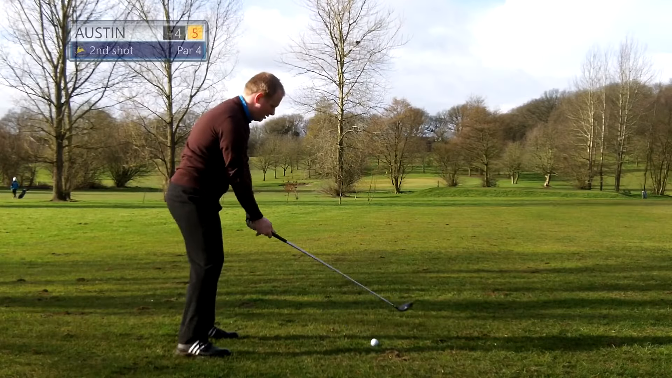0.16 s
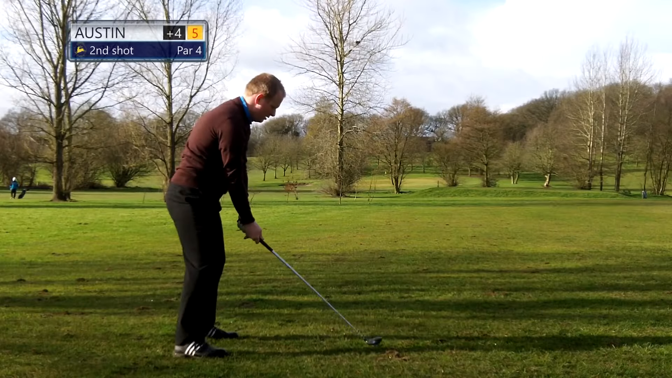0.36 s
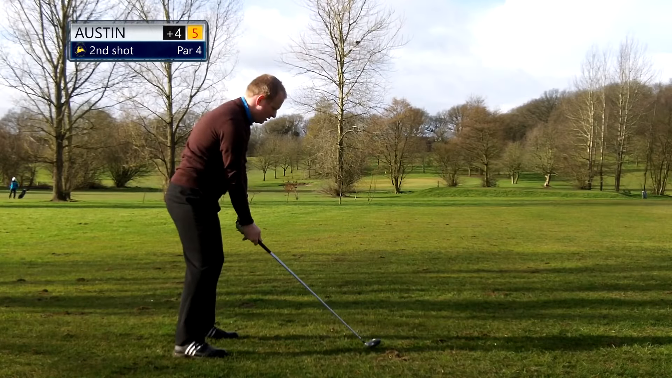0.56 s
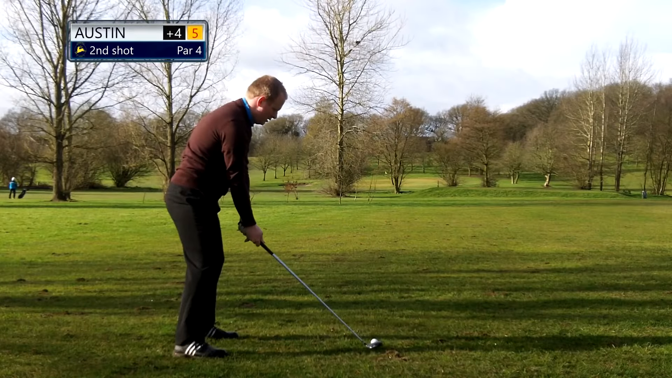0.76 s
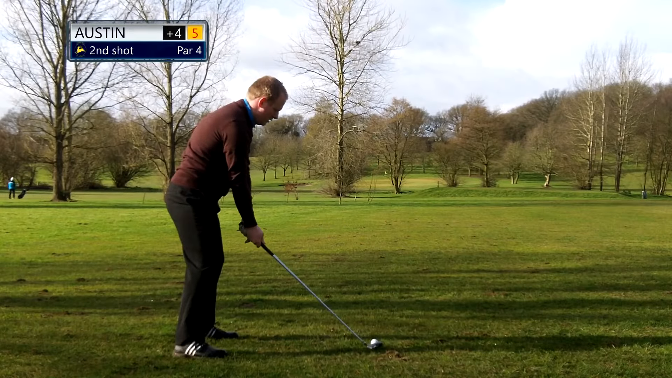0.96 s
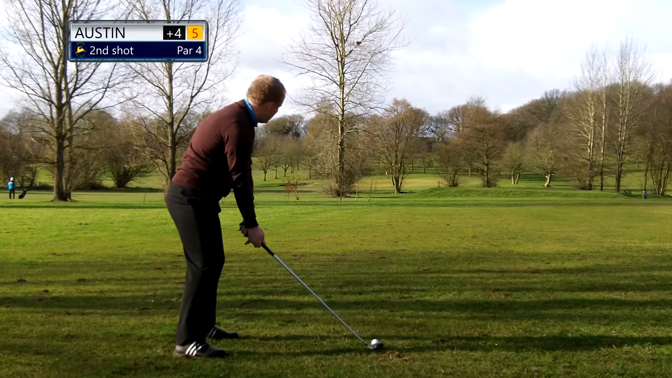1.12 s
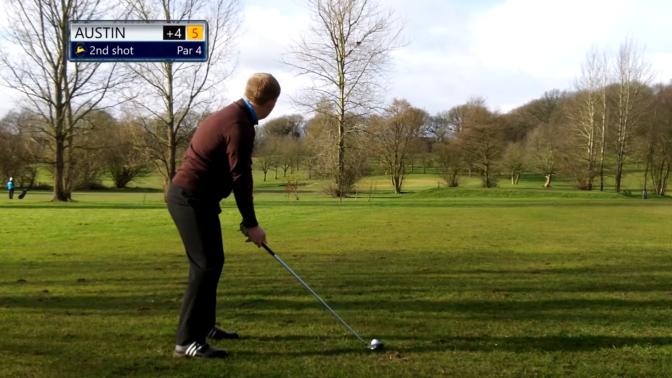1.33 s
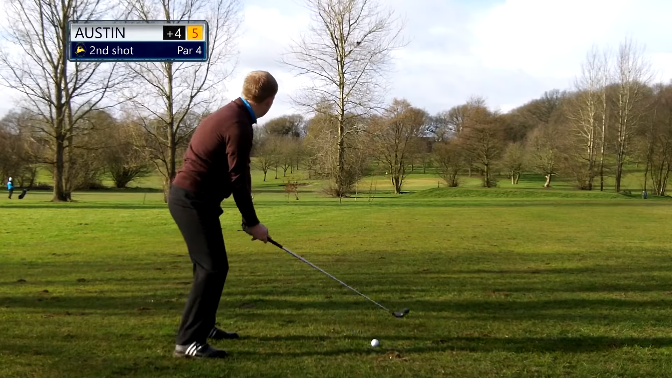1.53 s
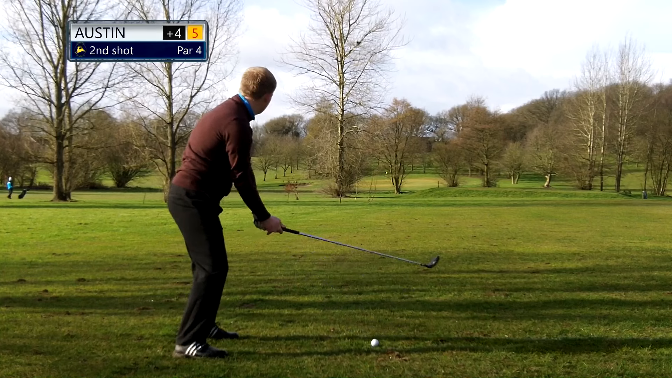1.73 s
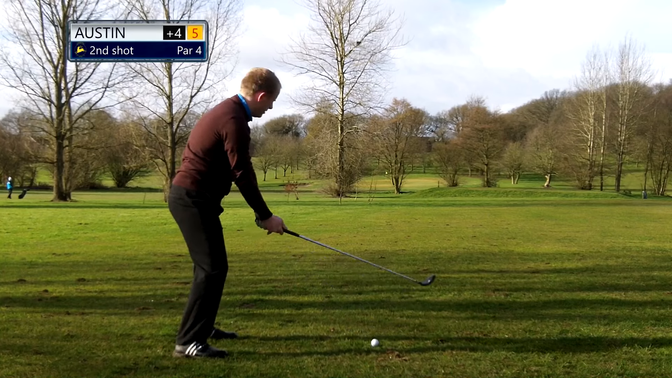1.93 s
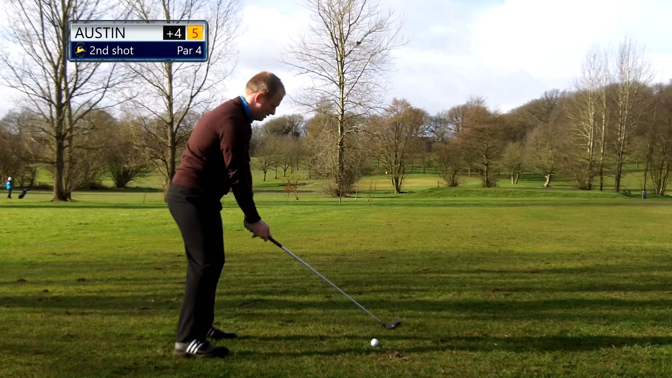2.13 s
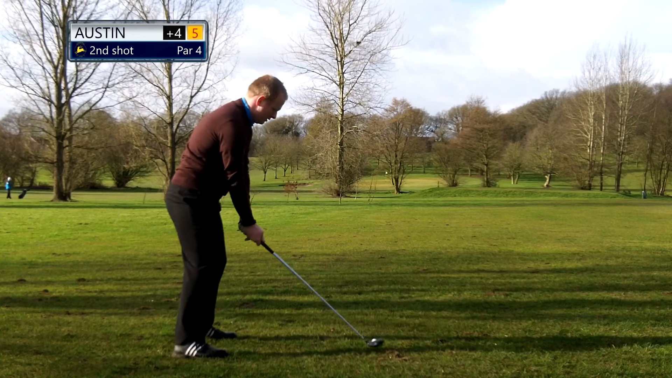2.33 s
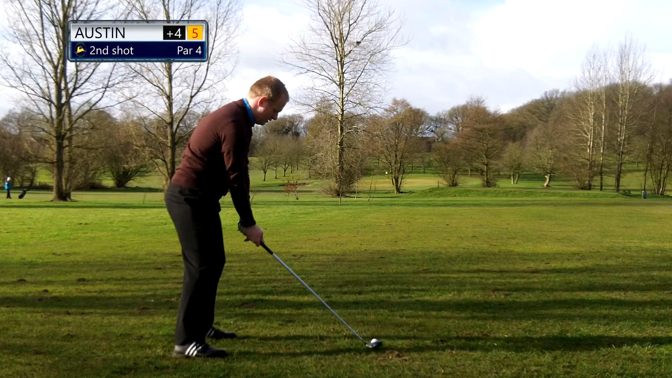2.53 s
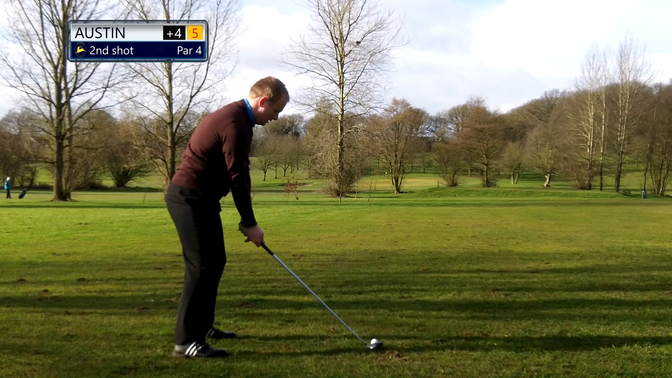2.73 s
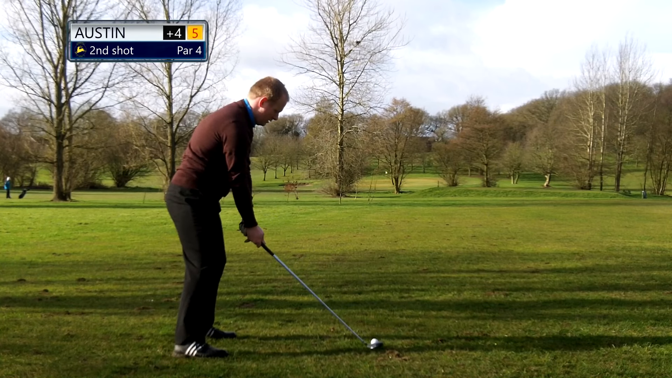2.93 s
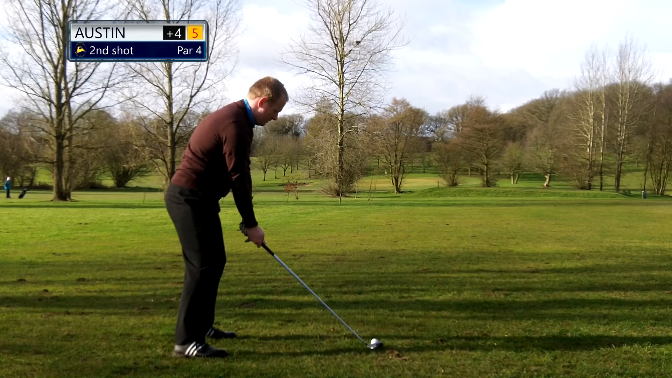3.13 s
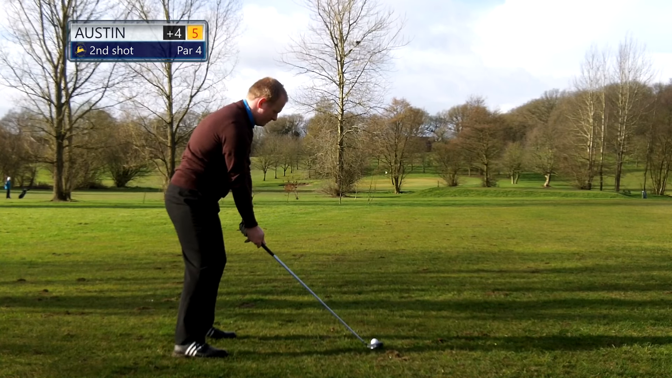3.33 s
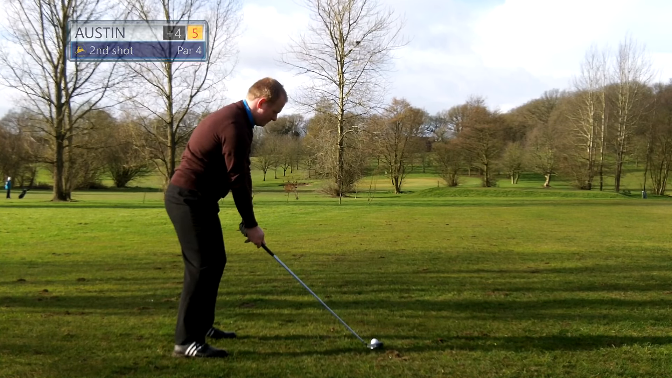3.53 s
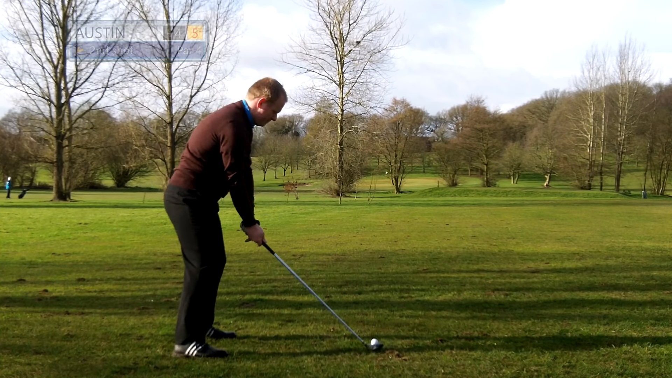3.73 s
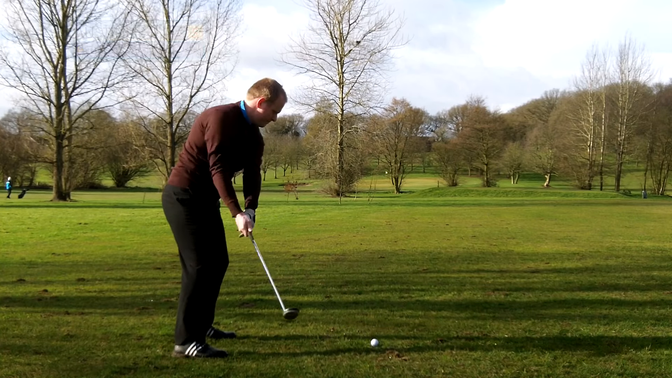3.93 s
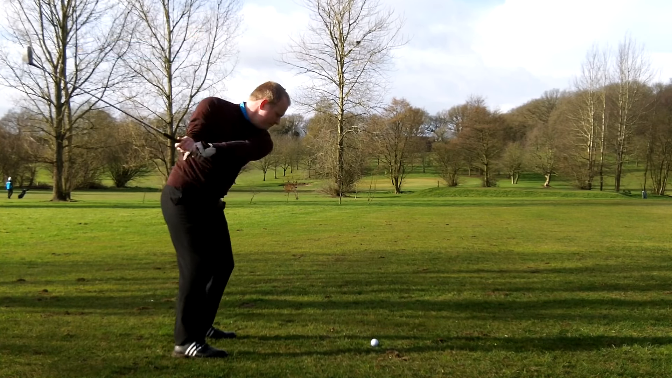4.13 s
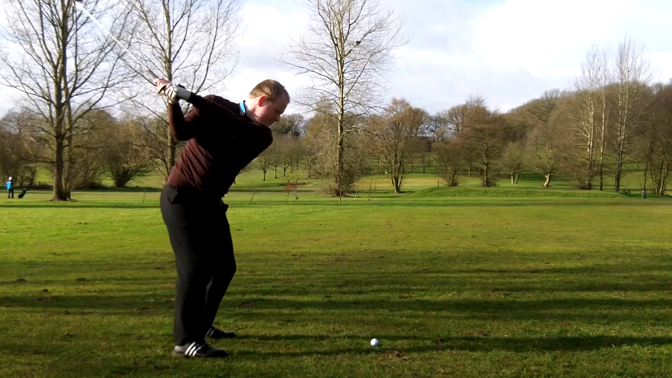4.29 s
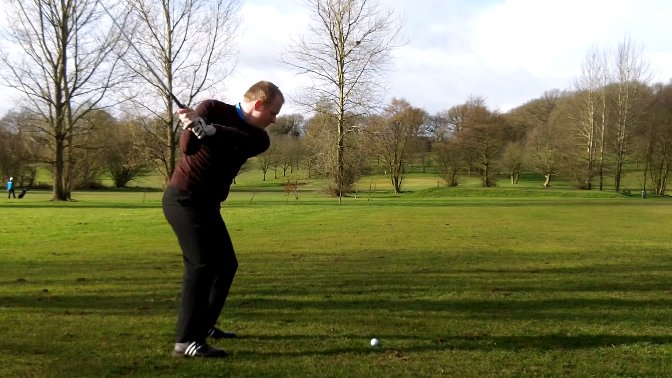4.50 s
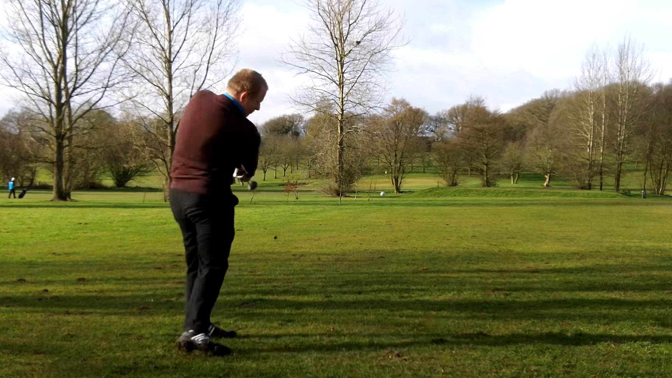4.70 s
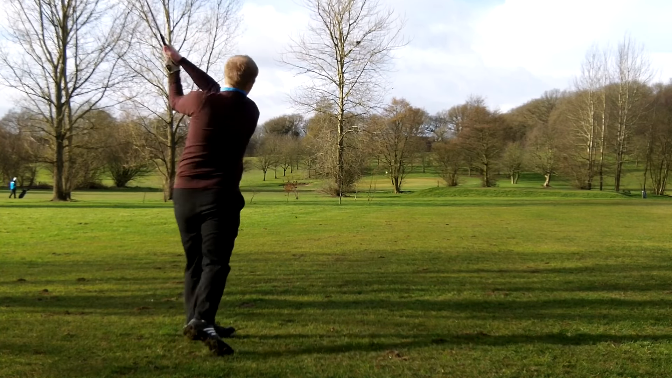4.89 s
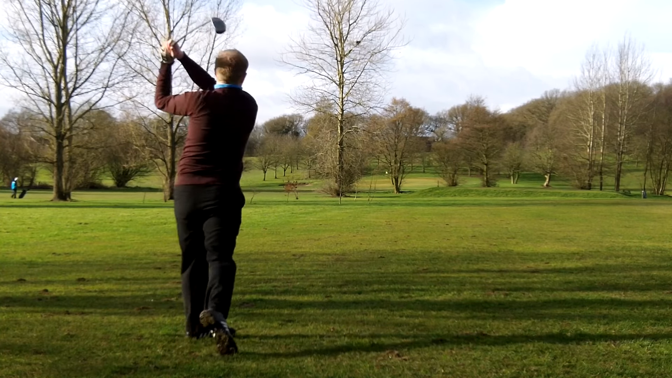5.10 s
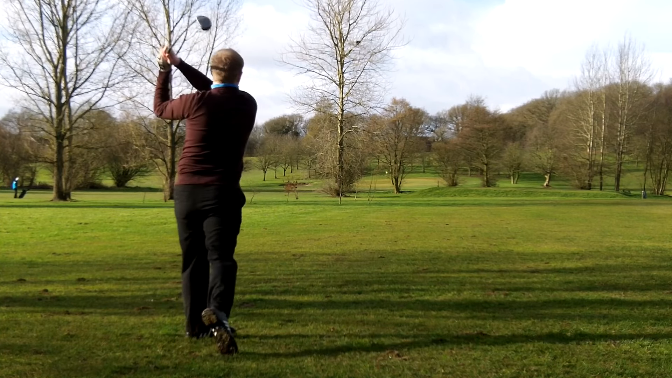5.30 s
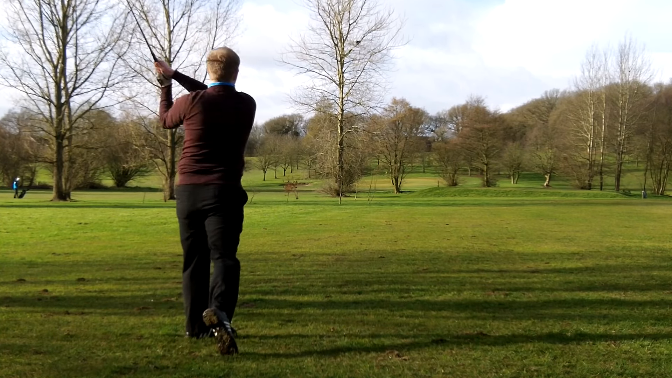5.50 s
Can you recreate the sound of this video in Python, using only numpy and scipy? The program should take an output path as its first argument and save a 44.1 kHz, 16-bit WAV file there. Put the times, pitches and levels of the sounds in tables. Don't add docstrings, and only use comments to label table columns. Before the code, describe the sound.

On an open golf course, far traffic hums low and wind bumps the microphone while distant birds whistle and chatter. A dry wooden knock with a low thump comes early on. Near the end a brief swish leads into one very loud, clipped click of club on ball with a spray of turf. The background dips for an instant, then dull echoes return from the trees.

```python
import sys
import numpy as np
from scipy import signal
from scipy.fft import rfft, irfft
from scipy.io import wavfile
from scipy.ndimage import uniform_filter1d, map_coordinates

SR = 44100
rng = np.random.default_rng(int(sys.argv[2]) if len(sys.argv) > 2 else 0)


def dump_mix(stems):
    frames = np.atleast_2d(stems).T
    limited = np.clip(frames, -1, 1)
    pcm = np.round(limited * 32767).astype(np.int16)
    wavfile.write(sys.argv[1], SR, pcm)


def attenuation_scalar(level_db):
    decades = np.asarray(level_db, float) / 20
    return 10 ** decades


N = 244755
STRIKE_S = 4.738777


def unit(x):
    return x / np.sqrt(np.mean(x ** 2) + 1e-20)


def curves(rows):
    s, *columns = np.transpose(rows)
    return [np.interp(np.arange(N) / SR, s, column) for column in columns]


def wobble(rate, size=N):
    knots = rng.standard_normal(int(size * rate / SR) + 4)
    return map_coordinates(knots, [np.arange(size) * rate / SR])


def noise(gain, size=N):
    hz = np.fft.rfftfreq(size, 1 / SR) + 1
    return unit(irfft(rfft(rng.standard_normal(size)) * gain(hz), size))


def shape(points):
    f, db = np.transpose(points)
    return lambda hz: attenuation_scalar(np.interp(np.log(hz), np.log(f), db))


def add(x, s, sound):
    part = x[round(s * SR):][:len(sound)]
    part += sound[:len(part)]


def road():
    # start_s, level_db
    swells = [(0, -52), (.4, -52), (.9, -51), (1.15, -49), (1.6, -54.5), (2.1, -50), (2.6, -51), (3.2, -49),
              (3.7, -52.5), (4.5, -47.5), (4.9, -44), (5.15, -48), (5.55, -49)]
    # pitch_hz, level_db
    engine_colour = [(40, -30), (80, -0.5), (130, -4.5), (160, -3), (250, -1.5), (300, -5.5), (400, -18),
                     (800, -42.5)]
    # pitch_hz, level_db
    tyre_colour = [(100, -8), (300, -4), (480, -4.5), (820, -1.5), (1200, -5), (2000, -10.5), (3000, -15.5),
                   (5000, -23.5), (8000, -42), (12000, -120)]
    tyres_db, tyres_follow = -52.5, 0.14
    drone_db = curves(swells)[0]
    traffic_db = tyres_db + tyres_follow * (drone_db - drone_db.mean())
    drone = unit(attenuation_scalar(2.1 * wobble(6.21)) * noise(shape(engine_colour)))
    tyres = unit(attenuation_scalar(0.64 * wobble(8.9)) * noise(shape(tyre_colour)))
    return attenuation_scalar(drone_db + 0.5) * drone + attenuation_scalar(traffic_db + 1.5) * tyres


def wind():
    # peak_s, peak_db
    gust_list = [(.23, -36), (.43, -46.5), (1.0, -48), (1.11, -32), (1.3, -42.5), (1.58, -40), (1.7, -48),
                 (1.82, -42), (2.02, -41), (2.12, -47), (2.29, -42.5), (2.8, -44), (3.18, -44), (3.48, -39),
                 (3.62, -53), (3.77, -46), (3.89, -44), (4.11, -43), (4.22, -47), (4.42, -49), (4.74, -36),
                 (4.92, -48), (5.16, -47), (5.44, -49)]
    # pitch_hz, level_db
    rumble_colour = [(15, 1), (30, -0.5), (55, -3), (80, -11), (130, -12.5), (300, -63)]
    rise_s, fall_s = 0.037, 0.078
    breeze_db, breeze_db_per_s = -48.5, -0.5
    t = np.arange(N) / SR
    gusts = np.zeros(N)
    for s, db in gust_list:
        gusts += attenuation_scalar(db) * np.exp(-np.maximum((s - t) / rise_s, (t - s) / fall_s))
    rumble = unit(attenuation_scalar(2.0 * wobble(31)) * noise(shape(rumble_colour)))
    return np.hypot(gusts, attenuation_scalar(breeze_db + breeze_db_per_s * t)) * rumble


def flocks():
    # start_s, length_s, centre_hz, width_hz, level_db
    bursts = [(0.093, 1, 3200, 350, -67), (1.551, 0.79, 3460, 250, -63), (2.402, 0.25, 4150, 250, -67),
              (2.552, 0.39, 3700, 350, -61.5), (3.489, 0.13, 3300, 180, -59), (3.55, 0.3, 3270, 300, -67),
              (3.651, .25, 2214, 100, -65), (4.85, 0.39, 3900, 300, -63), (5.416, 0.144, 4000, 300, -71)]
    x, size = np.zeros(N), 65536
    for s, length, centre_hz, width_hz, db in bursts:
        u = np.linspace(0, 1, int(length * SR))
        band = noise(lambda hz: np.exp(-.5 * ((hz - centre_hz) / width_hz) ** 2), size=size)
        chatter = unit(attenuation_scalar(1.9 * wobble(41.1, size=size)) * band)
        add(x, s, attenuation_scalar(db) * np.sin(np.pi * u) ** .5 * chatter[:len(u)])
    return x


def tit():
    # start_s, low_db, high_db
    pairs = [(1.105, -70, -56), (1.63, -67, -57.5), (2.135, -60, -68), (2.62, -64, -74), (3.14, -71, -58),
             (3.64, -65, -60), (4.19, -60, -58)]
    low_hz, low_s, rise_hz = 3370, 0.084, 30
    high_hz, high_s, fall_hz, gap_s = 4540, 0.065, 100, .218
    low = [(s, low_s, low_hz, low_hz + rise_hz, db, .25) for s, db, _ in pairs]
    high = [(s + gap_s, high_s, high_hz, high_hz - fall_hz, db, .07) for s, _, db in pairs]
    return low + high


def thrush():
    # start_s, length_s, pitch_hz, level_db
    pipes = [(0.807, .06, 2310, -51), (0.946, 0.17, 2320, -63), (1.235, .045, 2300, -60),
             (1.534, 0.069, 2390, -56), (1.907, 0.048, 2354, -53.5), (1.955, 0.12, 2360, -61),
             (2.378, 0.064, 2350, -59), (2.429, 0.078, 2340, -62.5)]
    sag_hz_per_s = 430
    return [(s, length, hz, hz - sag_hz_per_s * length, db, .12) for s, length, hz, db in pipes]


def warbler():
    # start_s, length_s, pitch_hz, level_db
    held_notes = [(.5, .065, 3240, -66), (1.052, 0.034, 4450, -62), (2.425, .05, 4200, -68),
                  (1.125, 0.095, 3480, -58), (1.64, 0.23, 3370, -66), (1.9, 0.022, 3480, -59),
                  (2.557, .014, 3870, -57), (2.58, 0.016, 3730, -53), (2.555, .045, 4420, -65),
                  (2.688, .06, 4260, -64.5), (2.745, .045, 4390, -62), (2.79, .02, 4150, -63),
                  (2.794, 0.032, 3765, -54.5), (3.2, .042, 3420, -63), (3.21, .11, 3070, -69),
                  (4.337, .05, 4425, -67), (4.592, .06, 2950, -67), (4.624, .03, 3860, -56),
                  (4.65, .045, 3920, -57), (4.762, 0.061, 3730, -49.5), (4.835, 0.044, 3670, -53.5),
                  (4.871, .13, 3800, -61.5), (4.89, 0.066, 4180, -64), (4.99, .046, 4380, -61),
                  (4.996, 0.15, 4050, -65), (5.213, .05, 4385, -63), (5.474, .03, 4180, -61),
                  (5.493, .03, 4110, -64), (5.525, .024, 4230, -66)]
    return [(s, length, hz, hz, db, .14) for s, length, hz, db in held_notes]


def robin():
    # start_s, length_s, start_hz, end_hz, level_db
    strokes = [(.177, 0.013, 4300, 3270, -53.5), (0.189, 0.013, 3250, 3650, -51),
               (.197, .024, 3650, 2500, -57), (.237, 0.012, 2700, 3250, -58),
               (.248, 0.013, 3250, 3050, -54), (.258, .012, 3050, 4120, -56),
               (0.405, .024, 4400, 3500, -55), (0.474, 0.016, 3000, 3350, -51.5),
               (0.483, .012, 3400, 2850, -58), (0.579, 0.028, 3850, 5700, -56.5),
               (0.64, .018, 4800, 3580, -60), (0.657, 0.028, 3630, 2600, -56.5),
               (.908, 0.018, 4080, 4500, -59), (1.104, .03, 3320, 3470, -56), (1.105, .08, 3036, 3340, -65),
               (1.347, .03, 4880, 5120, -64), (2.45, .03, 3900, 4280, -68), (2.49, .029, 4100, 4500, -68),
               (2.53, .03, 3115, 4600, -59.5), (2.678, 0.014, 3650, 4030, -55),
               (2.692, .013, 3950, 3350, -52.5), (2.739, .01, 3800, 4200, -57),
               (5.447, .03, 3200, 3800, -65)]
    return [(*row, .12) for row in strokes]


def callers():
    # start_s, length_s, start_hz, end_hz, level_db
    calls = [
        (1.887, 0.067, 1680, 1820, -58),
        (2.141, 0.041, 3600, 3595, -58),
        (2.66, 0.077, 1187, 1127, -56.5),
        (3.093, .074, 1730, 1770, -59),
        (3.496, 0.066, 3515, 3186, -54),
    ]
    return [(*row, .35) for row in calls]


def birds():
    x = np.zeros(N)
    for s, length, start_hz, end_hz, db, rough in tit() + thrush() + warbler() + robin() + callers():
        u = np.linspace(0, 1, int(length * SR))
        pitch_shake = 110 * rough * wobble(145, size=16384)[:len(u)]
        level_shake = 3.3 * rough * wobble(70, size=16384)[:len(u)]
        hz = start_hz + (end_hz - start_hz) * u + pitch_shake
        level = np.sin(np.pi * u) ** 0.3 * attenuation_scalar(db + 4 - 2.5 * u + level_shake)
        add(x, s, level * np.sin(2 * np.pi * np.cumsum(hz) / SR))
    t = np.arange(SR // 2) / SR
    trees = rng.standard_normal(len(t)) * attenuation_scalar(-60 * t / .5)
    return x + attenuation_scalar(-7) * signal.fftconvolve(x, trees / np.linalg.norm(trees))[:N]


def puffs(rows, octaves):
    x, t = np.zeros(N), np.arange(16384) / SR
    for s, db, centre_hz, t60 in rows:
        puff = noise(lambda hz: np.exp(-.5 * (np.log2(hz / centre_hz) / octaves) ** 2), size=len(t))
        add(x, s, attenuation_scalar(db - 60 * t / t60) * (1 - np.exp(-t / 0.002)) * puff)
    return x


def knock():
    # start_s, peak_db, centre_hz, t60_s (time to fade by 60 dB)
    parts = [
        (1.0354, -36, 2660, .018),
        (1.045, -40, 2200, .017),
        (1.081, -26, 1200, 0.019),
        (1.0842, -28, 2550, 0.02),
        (1.086, -34.5, 695, 0.073),
        (1.092, -38, 298, .12),
        (1.093, -38.5, 1730, 0.054),
        (1.1, -39, 3000, 0.016),
        (1.186, -41, 1000, 0.044),
    ]
    return puffs(parts, octaves=0.34)


def thumps():
    # start_s, level_db, pitch_hz, t60_s
    tones = [
        (1.082, -31, 38.8, 0.44),
        (1.104, -27, 69.6, 0.093),
        (1.134, -32, 45, 0.26),
        (4.7406, -24, 2580, 0.015),
    ]
    x, t = np.zeros(N), np.arange(16384) / SR
    for s, db, hz, t60 in tones:
        add(x, s, attenuation_scalar(db - 60 * t / t60) * (1 - np.exp(-t / 0.0028)) * np.sin(2 * np.pi * hz * t))
    return x


def echoes():
    # delay_s after the click, peak_db, centre_hz
    tree_lines = [(.273, -43.5, 1950), (.306, -41, 2700), (.32, -38, 1700), (0.331, -39.5, 2100),
                  (.346, -46, 2900), (.379, -40, 1000), (.383, -46, 2300), (.408, -44, 1910),
                  (0.416, -43.5, 2200), (.571, -44.5, 2000)]
    returns = [(STRIKE_S + delay, db, hz, 0.047) for delay, db, hz in tree_lines]
    far_wood = [(STRIKE_S + .108, -50, 1580, 1.7)]
    return puffs(returns, octaves=0.35) + puffs(far_wood, octaves=0.8)


def turf():
    # start_s, peak_db, centre_hz, t60_s
    contacts = [
        (4.655, -44, 2800, .03),
        (4.736, -29, 2400, 0.025),
        (4.74, -29, 5000, 0.015),
        (4.7435, -13, 2500, 0.015),
        (4.748, -31, 2130, 0.095),
        (4.77, -48, 2290, 0.59),
    ]
    return puffs(contacts, octaves=0.56)


def swish():
    # start_s, level_db, whistle_hz
    swing = [
        (4.5, -84, 453),
        (4.58, -71, 499),
        (4.65, -64, 565),
        (4.685, -52, 642),
        (4.715, -44, 747),
        (4.738, -47, 704),
        (4.743, -65, 717),
        (4.76, -120, 720),
    ]
    # pitch_hz, level_db
    wake_colour = [(300, -25), (800, -1), (1500, 0.5), (2500, 3.5), (4000, -10), (6000, -15), (8000, -37)]
    db, hz = curves(swing)
    turn = 2 * np.pi * np.cumsum(hz) / SR
    whistle = attenuation_scalar(2.4 * wobble(50)) * np.sin(turn) + 0.51 * wobble(90) * np.sin(2 * turn)
    wake = attenuation_scalar(wobble(90)) * noise(shape(wake_colour))
    return attenuation_scalar(db) * (wake + attenuation_scalar(2) * whistle)


def strike():
    # pitch_hz, level_db, t60_s
    ball_modes = [(996, -9, .0064), (1600, 40, .00145), (1960, 30.2, .00227), (2260, 16.7, .00366)]
    t = np.maximum(np.arange(N) / SR - STRIKE_S, 0)
    ring = sum(attenuation_scalar(db - 60 * t / t60) * np.sin(2 * np.pi * hz * t) for hz, db, t60 in ball_modes)
    return -ring * (1 - np.exp(-t / .00106)) ** 2


def scene():
    background = road() + wind() + flocks() + birds() + knock() + thumps()
    return (background + echoes() + turf() + swish() + strike())[None]


def ducking():
    duck_db, attack_s, hold_s, release_s = -12.5, 0.004, 0.033, 0.12
    start = STRIKE_S + 0.0032
    held = start + attack_s + hold_s
    return attenuation_scalar(curves([(start, 0), (start + attack_s, duck_db), (held, duck_db), (held + release_s, 0)])[0])


def mute_weak_treble(x):
    hz, _, z = signal.stft(x, SR, nperseg=2048)
    mute_db = np.select([hz > 15300, hz > 5000], [-80, -98], -200)[:, None]
    weak = uniform_filter1d(np.abs(z), size=3, axis=1) < attenuation_scalar(mute_db)
    return signal.istft(z * ~weak, SR, nperseg=2048)[1][:, :N]


def low_pass(x):
    return signal.sosfilt(signal.butter(12, 16550, fs=SR, output="sos"), x)


def record(dry):
    # pitch_hz, level_db
    line_colour = [(6500, 0), (7500, -7), (8400, 0.5), (12000, 2), (14500, 6), (15700, 6), (16600, -30)]
    # pitch_hz, level_db
    hiss_colour = [(1000, -20), (3000, 3), (5000, 0), (6500, -1.5), (7300, -5.5), (7900, -15.5),
                   (8500, -5.5), (9500, -1.5), (13000, -1.5), (15100, -1), (15350, -86.5)]
    duck = ducking()
    ducked = dry * duck
    clipped = ducked / (1 + np.abs(ducked) ** 16) ** (1 / 16)
    hz = np.fft.rfftfreq(N, 1 / SR) + 1
    coloured = irfft(rfft(clipped) * shape(line_colour)(hz), N)
    hiss = duck * attenuation_scalar(-60.5) * noise(shape(hiss_colour))
    return low_pass(mute_weak_treble(coloured + hiss))


dry = scene()
out = record(dry)
dump_mix(out)
```